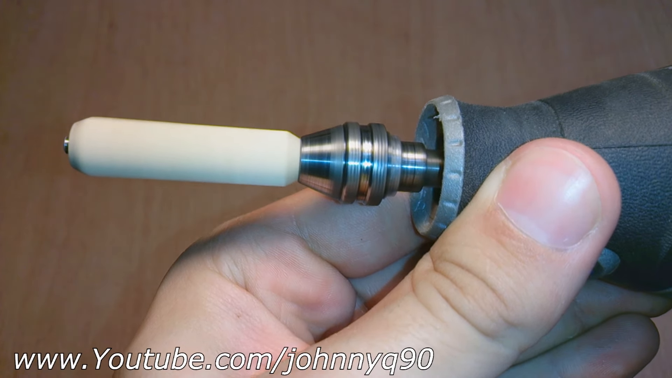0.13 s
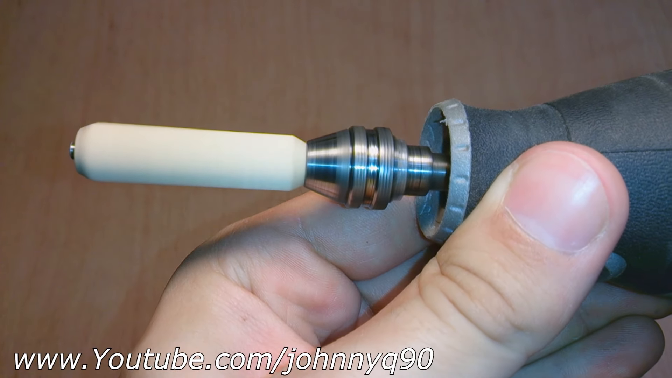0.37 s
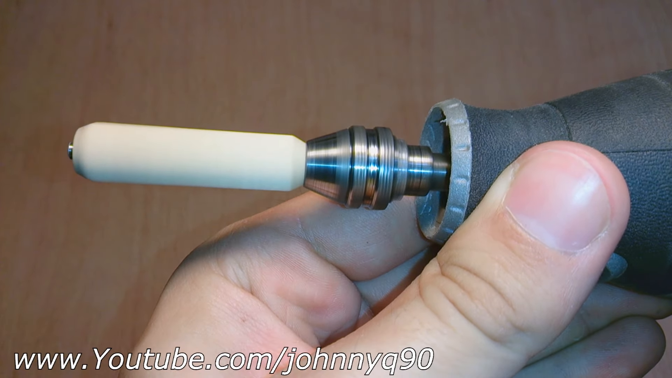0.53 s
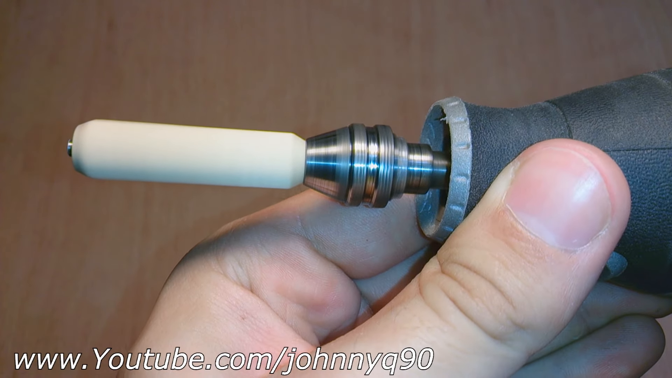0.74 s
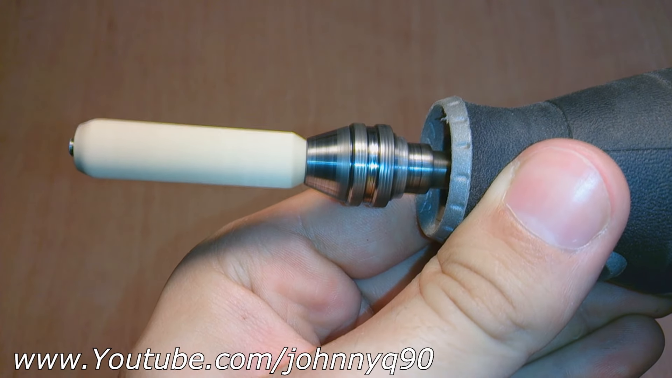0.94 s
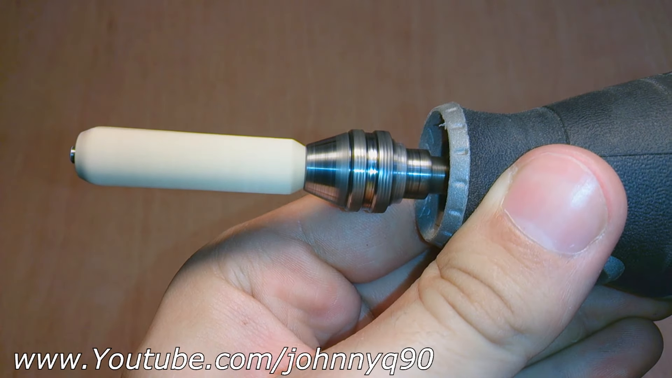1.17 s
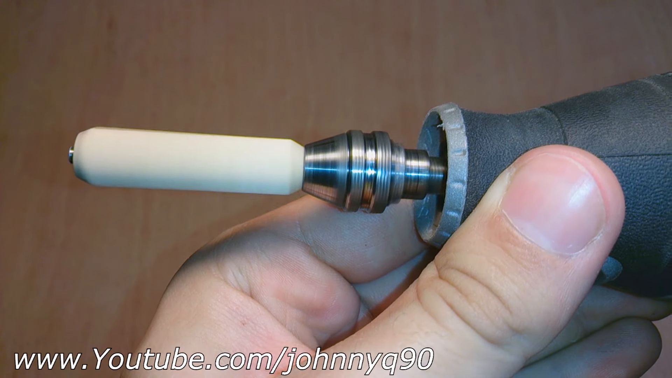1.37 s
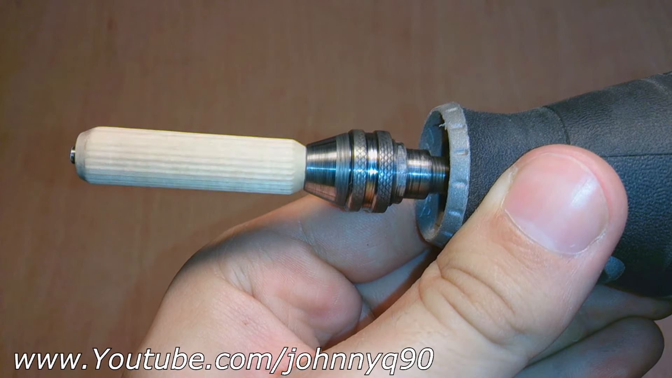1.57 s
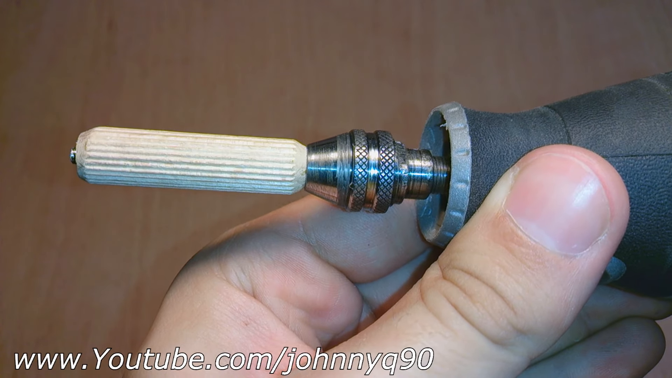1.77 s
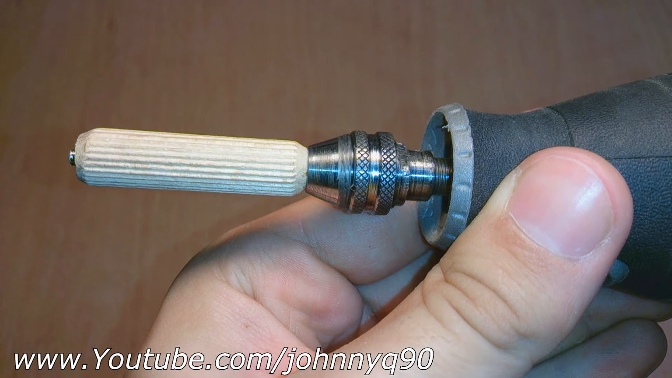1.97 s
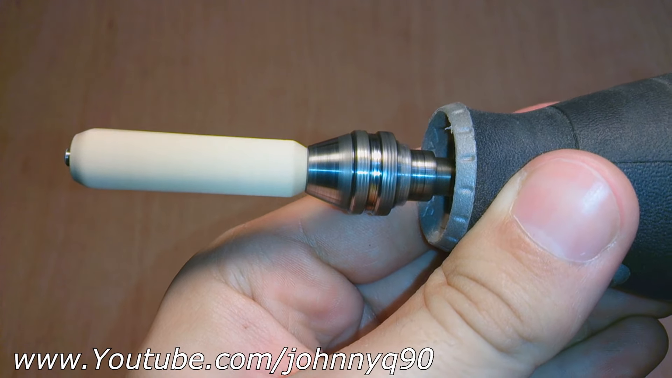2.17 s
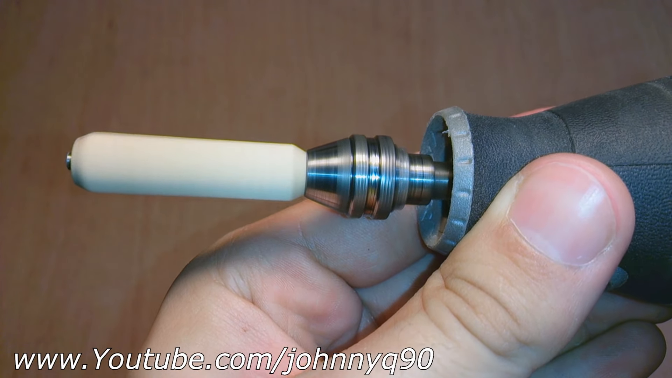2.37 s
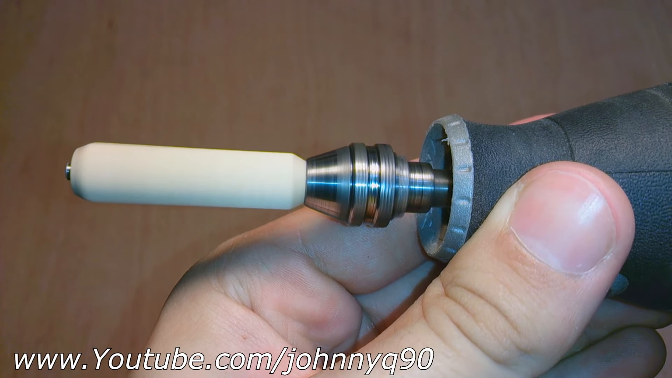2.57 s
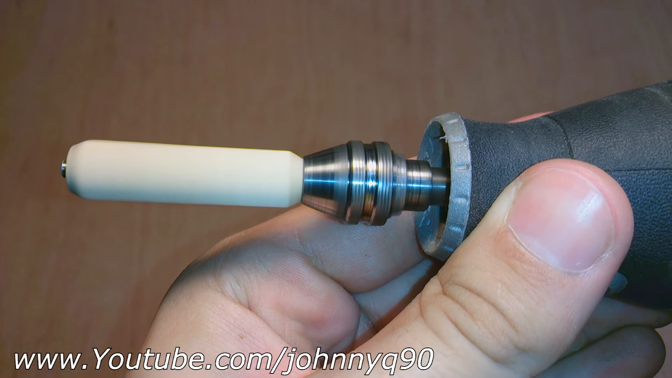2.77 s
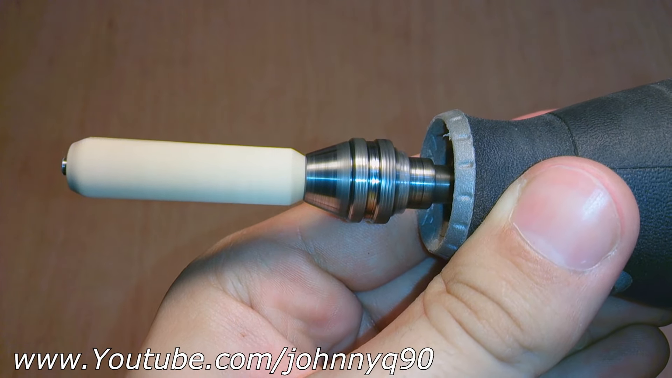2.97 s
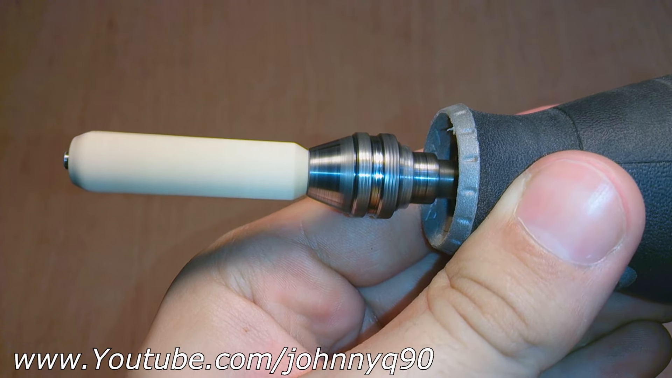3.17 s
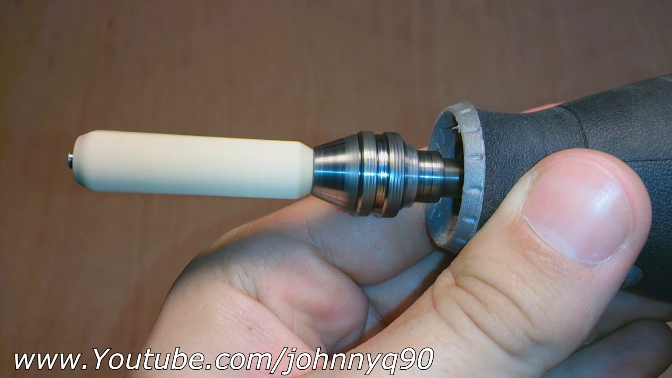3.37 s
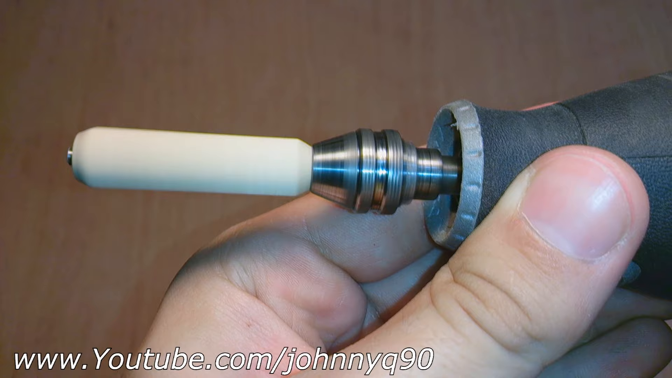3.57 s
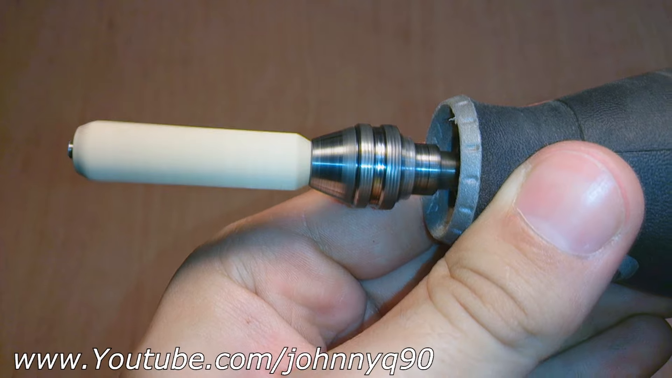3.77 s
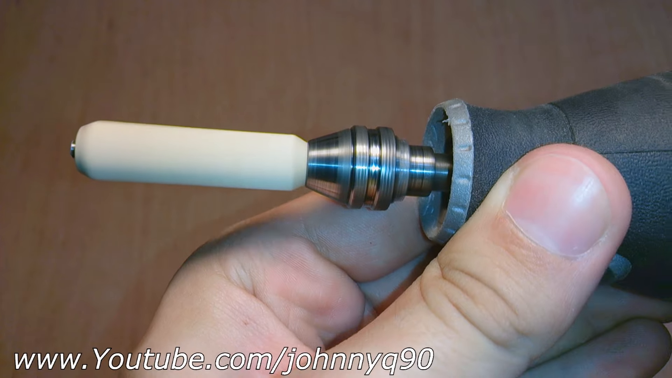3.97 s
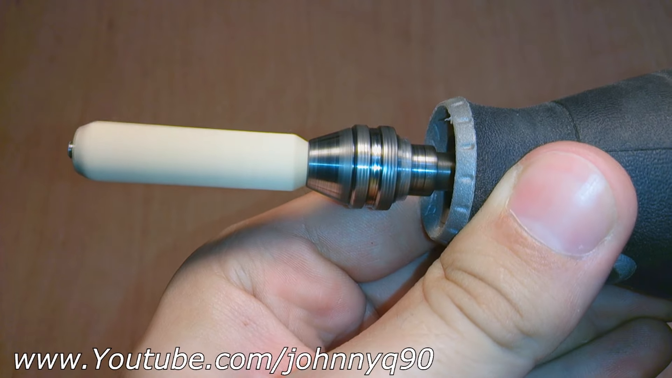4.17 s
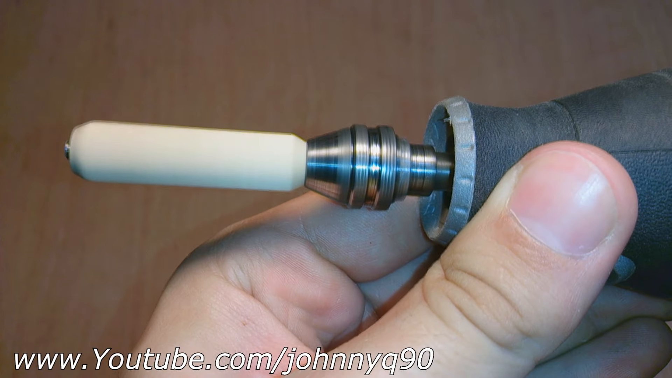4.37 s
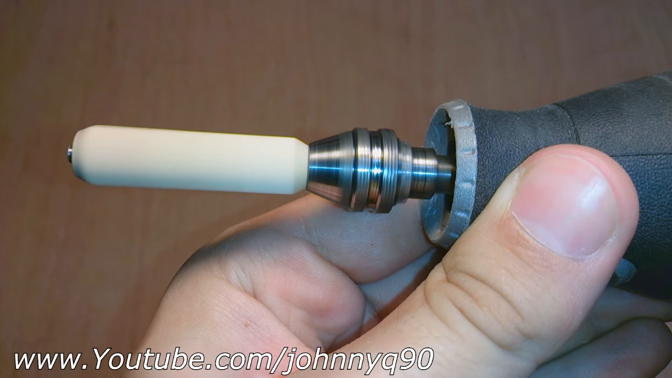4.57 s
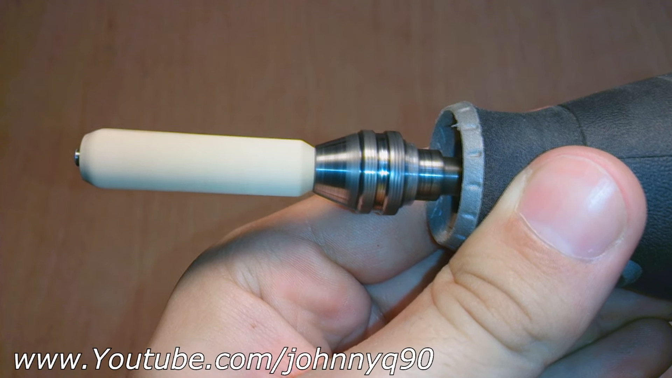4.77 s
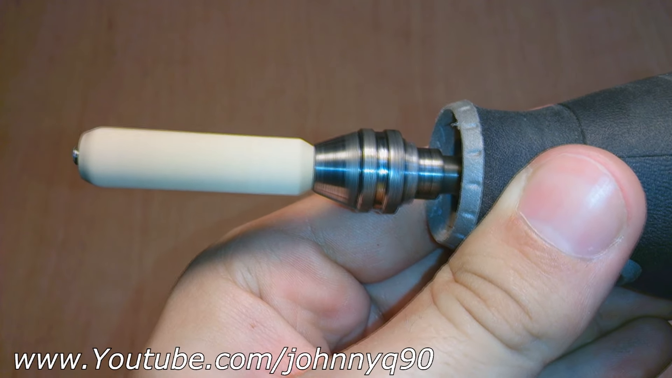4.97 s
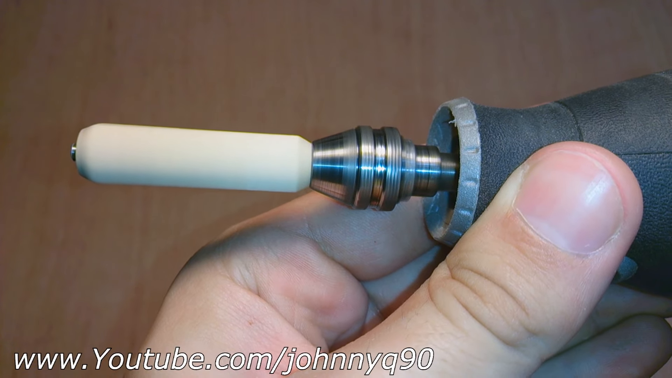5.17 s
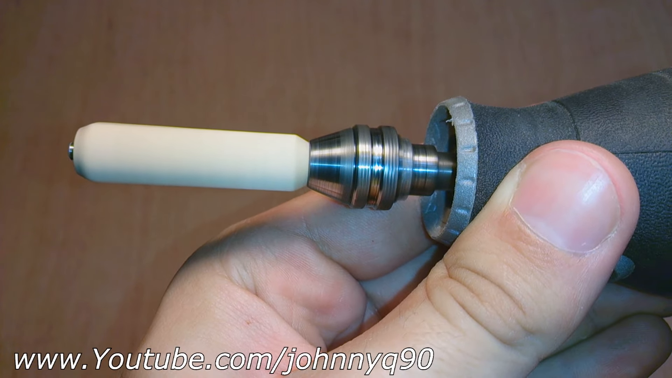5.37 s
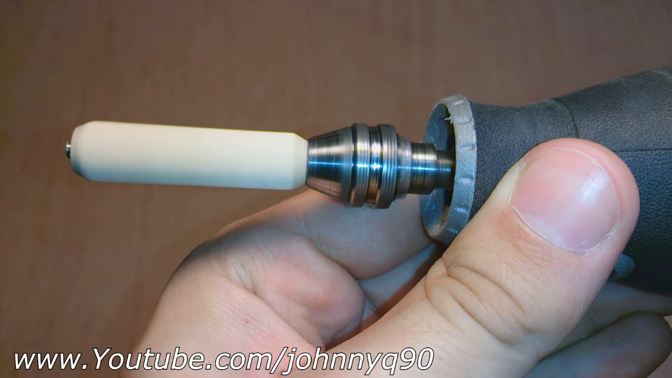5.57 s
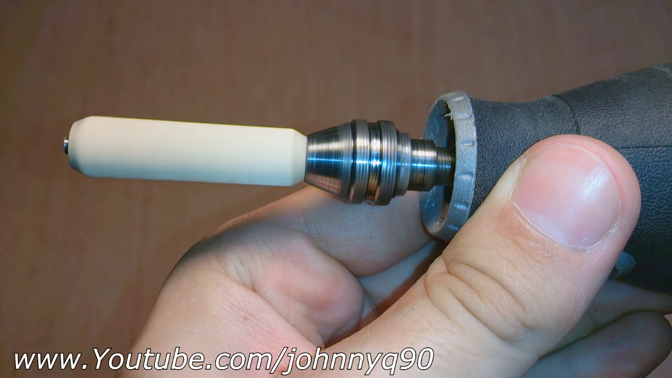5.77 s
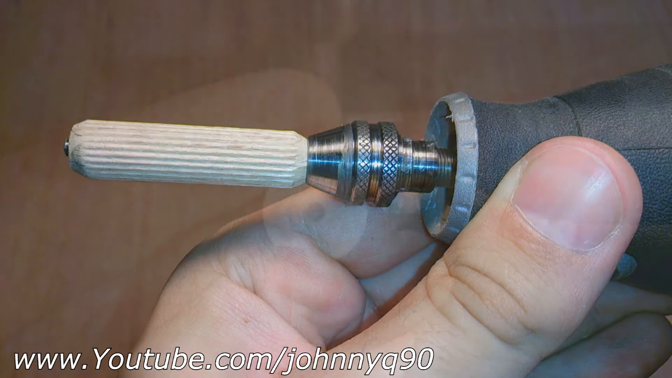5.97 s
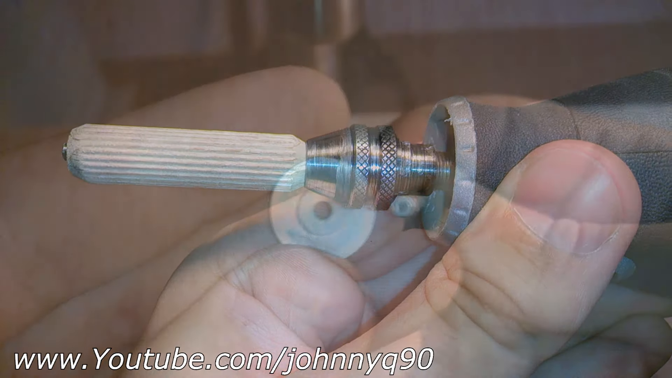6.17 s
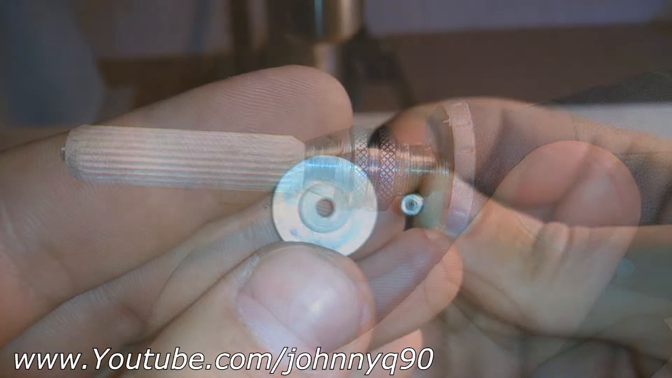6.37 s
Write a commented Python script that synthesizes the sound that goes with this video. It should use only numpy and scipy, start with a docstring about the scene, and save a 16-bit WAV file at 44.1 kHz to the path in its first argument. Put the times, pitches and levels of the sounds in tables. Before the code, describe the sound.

Close up, a handheld rotary tool spins down, revs up to a shrill whine with fluttering air, and coasts to a ticking stop.

```python
"""A handheld rotary tool spins a small wooden dowel close to the microphone. First it coasts to rest under
friction and fan drag, its carbon brushes slowing to single snaps. At 2.2 s the switch knocks, the brushes
fizz and the shaft climbs to full speed: the fan whines, the brushes hiss, ball bearings sing, the housing
rattles and cooling air buffets the microphone. At 4.1 s the power is cut with a squeak; the shaft coasts
to rest by 6.1 s, and light knocks follow. The right channel holds only a faint, hollow trace throughout."""
import sys
import numpy as np
from scipy import signal
from scipy.fft import rfft, irfft, next_fast_len
from scipy.io import wavfile
from scipy.ndimage import uniform_filter1d, map_coordinates

SR = 44100
rng = np.random.default_rng(int(sys.argv[2]) if len(sys.argv) > 2 else 0)


def dump_mix(stems):
    """Bounce the given channels to the path in sys.argv[1] as a 16-bit WAV at rate SR."""
    frames = np.atleast_2d(stems).T  # one column per channel
    limited = np.clip(frames, -1, 1)  # hard clip at full scale
    pcm = np.round(limited * 32767).astype(np.int16)
    wavfile.write(sys.argv[1], SR, pcm)


N = 282681
T = np.arange(N) / SR
SWITCH_ON_S, SWITCH_OFF_S = 2.233, 4.061
TOP_SPEED = 470.8   # all shaft speeds are in turns per second

# housing resonances: centre_hz, width_hz, gain_db
HOUSING_MODES = [(1170, 330, -17.5), (1900, 400, -8), (3384, 280, -3), (4388, 200, 6.5), (7330, 620, -8)]
# spectrum of sliding carbon: frequency_hz, level_db
BRUSH_SPECTRUM = [(3000, -33.5), (6000, -17), (7100, -11.5), (8300, -5.5), (9100, -6), (9750, -0.5),
                  (10600, -1), (11400, -5), (12100, -14), (12900, -7), (14000, -16.5), (15700, -17.5)]
# spectrum of the background hiss: frequency_hz, level_db
HISS_SPECTRUM = [(20, -2.5), (70, -13.5), (120, -17), (200, -25), (500, -31.5), (2000, -40.5), (8500, -41),
                 (10500, -29.5), (11250, -27), (12000, -30.5), (14000, -37), (15000, -28), (15800, -41.5)]
# the two coast-downs: standstill_s, drag_turns_per_s (where fan drag equals dry friction),
# miss_turns_per_s (below which the air misses the microphone)
COAST_DOWNS = [(1.7645, 513.2, 62), (6.057, 549, 112)]


def from_db(db):
    """Amplitude ratio of a level in decibels."""
    return 10 ** (np.asarray(db) / 20)


def rms_one(x):
    """Normalisation to an rms of 1."""
    return x / np.sqrt(np.mean(x ** 2) + 1e-20)


def even(x):
    """Division by the running 50 ms rms holds the level steady."""
    return x / np.sqrt(np.abs(uniform_filter1d(x * x, size=2205)) + 1e-9)


def ramp(start_s, length_s):
    """Linear rise from 0 to 1."""
    return np.clip((T - start_s) / length_s, 0, 1)


def noise():
    """Gaussian white noise of rms 1."""
    return rng.standard_normal(N)


def drift(rate_hz):
    """Low-passed noise: a random fluctuation of rms 1."""
    pole = np.exp(-20 * np.pi * rate_hz / SR)
    slow = signal.lfilter([1], [1, -2 * pole, pole * pole], rng.standard_normal(N // 10 + 4002))[4000:]
    return np.interp(np.arange(N) / 10, np.arange(len(slow)), rms_one(slow))


def colour(x, spectrum):
    """Zero-phase filtering by a curve of decibels over log frequency."""
    size = next_fast_len(N + 4096)
    hz = np.fft.rfftfreq(size, 1 / SR)
    corners_hz, db = np.transpose(spectrum)
    gain = from_db(np.interp(np.log(hz + 1e-9), np.log(corners_hz), db))
    return irfft(rfft(x, size) * gain, size)[:N]


def resonate(x, modes):
    """Modal superposition: damped resonators in parallel, with alternating signs."""
    out = 0
    for k, (hz, width_hz, db) in enumerate(modes):
        r = np.exp(-np.pi * width_hz / SR)
        ring = signal.lfilter([1, 0, -1], [1, -2 * r * np.cos(2 * np.pi * hz / SR), r * r], x + 1e-18)
        out = out + (-1) ** k * from_db(db) * (1 - r * r) / 2 * ring
    return out


def reflections(x, t60_s, gap_s):
    """Diffuse reverberation: convolution with a decaying noise tail of unit energy."""
    age = np.arange(SR // 2) / SR
    tail = rng.standard_normal(len(age)) * from_db(-60 * age / t60_s) * (age > gap_s)
    return signal.fftconvolve(x, tail / np.linalg.norm(tail))[:N]


def strikes(events, modes, scuff_s):
    """Impact excitation: each contact is a brief scuff that rings the modes."""
    out, age = np.zeros(N), np.arange(2048) / SR
    for (start_s, db), grit in zip(events, rng.standard_normal((len(events), len(age)))):
        hit = resonate(grit * np.exp(-age / scuff_s), modes)
        start = round(start_s * SR)
        out[start:start + len(age)] += (from_db(db) * hit / np.abs(hit).max())[:N - start]
    return out


def shaft_speed(start_s=2.2747, quick_share=.4873, quick_s=.0898, slow_s=.3889):
    """Torque balance: the motor pulls toward top speed; unpowered, dry friction and fan drag brake it."""
    friction = 194.3   # turns per second lost each second
    first_coast, second_coast = [drag * np.tan(np.clip(friction / drag * (stop_s - T), 0, 1))
                                 for stop_s, drag, _ in COAST_DOWNS]
    age = np.maximum(T - start_s, 0)
    shortfall = quick_share * np.exp(-age / quick_s) + (1 - quick_share) * np.exp(-age / slow_s)
    return first_coast + np.minimum(TOP_SPEED * (1 - shortfall), second_coast)


def shaft_tones(turns, orders, waver_db, slip_rad):
    """Rotational orders: wavering tones at multiples of the shaft's speed."""
    tones = 0
    for multiple, db in orders:
        amplitude = from_db(db + waver_db * drift(30))
        tones = tones + amplitude * np.sin(2 * np.pi * multiple * turns + slip_rad * drift(15))
    return tones


def decades(speed, reference):
    """Logarithmic speed: tenfold steps above a reference."""
    return np.log10(speed / reference + 1e-6)


def fade_below(speed, limit):
    """Third-order roll-off below a limiting speed, in dB."""
    return -10 * np.log10(1 + (limit / (speed + 1e-3)) ** 6)


def noise_db(law, speed, load, crawl_speed=7.7, knee_speed=290, dip_speed=343):
    """Power law: running noise grows with speed up to a knee, then dips near top speed."""
    knee_db, db_per_decade, load_db, top_speed_dip_db = law
    dip = np.clip((speed - dip_speed) / (TOP_SPEED - dip_speed), 0, 1) ** 2
    growth_db = db_per_decade * np.minimum(decades(speed, knee_speed), 0)
    return knee_db + growth_db + load_db * load - top_speed_dip_db * dip + fade_below(speed, crawl_speed)


def hiss():
    """The noise floor: steady coloured noise."""
    return rms_one(colour(noise(), HISS_SPECTRUM))


def hum(pitch_hz):
    """A low tone wavers by random amplitude and phase modulation."""
    return from_db(2.5 * drift(8)) * np.sin(2 * np.pi * pitch_hz * T + .6 * drift(8))


def draught(speed, load, arrives_s=2.408):
    """Strength of the cooling air at the microphone: a power law of speed, gentler under drive."""
    # air on the microphone: knee_db, growth_db_per_decade, load_gain_db, top_speed_dip_db
    draught_law = (-31.5, 51, -6.5, 6)
    before_on = T < SWITCH_ON_S
    miss_speed = np.where(before_on, COAST_DOWNS[0][2], COAST_DOWNS[1][2])
    powered = ~before_on * (1 - ramp(SWITCH_OFF_S, 0.047))
    db = noise_db(draught_law, speed, load) + fade_below(speed, miss_speed) - 3.5 * powered
    return (before_on + ramp(arrives_s, 0.01)) * from_db(db)


def buffeting(speed, lump_db=3.5, full_speed=380, crisp_db=-14.5):
    """Turbulence hits the microphone in lumps, the hardest crisp; slower air makes longer, deeper puffs."""
    # eddy pressure at full_speed: frequency_hz, level_db
    eddy_spectrum = [(12, -34.5), (20, -5.5), (53, 5), (204, 0.5), (393, -5.5), (573, -14), (1000, -37),
                     (1300, -62), (2200, -120)]
    lumps = from_db(lump_db * drift(94))
    crisp = rms_one(resonate(noise() * lumps ** 2, [(550, 550, 0)]))
    eddies = rms_one(colour(noise() * lumps, eddy_spectrum))
    eddies += from_db(crisp_db) * colour(crisp, [(900, -2), (2500, -31.5)])
    pace = np.clip(speed / full_speed, .15, 1.2) ** 0.65
    puffs = from_db(7 * np.clip(.85 - pace, 0, .5) * (drift(25) - .5))
    stretched = map_coordinates(eddies, [np.cumsum(pace)], order=3, mode="mirror")
    return puffs * rms_one(stretched)


def gusts():
    """Pressure pulses of single hard eddies thump the microphone."""
    # eddies: start_s, level_db
    eddies = [(4.079, -30), (4.379, -24.5)]
    # bands of one thump: centre_hz, width_hz, gain_db
    thump_bands = [(330, 220, -1), (750, 300, -1)]
    return colour(strikes(eddies, thump_bands, scuff_s=.003), [(900, 0), (2500, -28)])


def snaps_and_knocks():
    """Impacts ring the modes of the brush holders and the casing, with a short echo."""
    # brushes snapping over single segment edges at a crawl, and one sharp click of the brushes as the power
    # arrives: start_s, level_db
    snaps = [(1.6521, -48), (1.7025, -45.5), (1.7474, -43), (1.7814, -45), (2.2543, -26), (5.9673, -44),
             (5.9754, -46), (6.0112, -41), (6.0204, -48), (6.0294, -45.5), (6.0621, -51.5)]
    # brush holder resonances: centre_hz, width_hz, gain_db
    holder_modes = [(9460, 430, -7), (10370, 870, 5), (11650, 450, 3), (12300, 1300, -6)]
    # light knocks of the switch and the casing: start_s, level_db
    knocks = [(2.125, -63), (2.2354, -58), (2.2413, -43.5), (2.2474, -55), (2.2543, -36.5), (2.2727, -40),
              (6.1474, -59), (6.3729, -52), (6.3795, -55)]
    # casing resonances: centre_hz, width_hz, gain_db
    casing_modes = [(1150, 640, -2), (1840, 360, 2), (3280, 980, 7.5), (4470, 520, 11), (5600, 320, 6.5)]
    contacts = strikes(snaps, holder_modes, scuff_s=0.0019) + strikes(knocks, casing_modes, scuff_s=0.0021)
    return from_db(-1.5) * contacts + from_db(-7) * reflections(contacts, t60_s=0.096, gap_s=.003)


def unbalance(turns, speed):
    """Rotating unbalance shakes the tool once per turn."""
    return speed / 400 * np.sin(2 * np.pi * turns)


def inrush(decay_s):
    """The brushes fizz as the power arrives, with exponential decay."""
    envelope = ramp(SWITCH_ON_S, 0.011) * np.exp(-np.maximum(T - SWITCH_ON_S, 0) / decay_s)
    return envelope * rms_one(colour(noise(), BRUSH_SPECTRUM))


def squeak(pitch_hz, width_hz, length_s):
    """A burst of narrow-band noise makes a rough squeak as the power is cut."""
    envelope = np.exp(-((T - SWITCH_OFF_S) / length_s) ** 2)
    return envelope * rms_one(resonate(noise(), [(pitch_hz, width_hz, 0)]))


def commutator(turns):
    """Forced vibration: the brush arms radiate tones at high multiples of the shaft's speed."""
    # tones: shaft_multiple, level_db
    orders = [(24, 0), (28, -6)]
    # radiation of the brush arms: frequency_hz, gain_db
    arm_response = [(1000, -20), (1900, -7), (2600, -10), (3700, 4), (4200, -12)]
    return colour(shaft_tones(turns, orders, waver_db=3, slip_rad=.2), arm_response)


def armature(turns):
    """The armature's periodic magnetic pull forces the motor can to vibrate."""
    # magnetic tones: shaft_multiple, level_db
    orders = [(8, 9), (15.6, -2.5), (16, 3.5), (16.3, -3.5)]
    # radiation of the motor can: frequency_hz, gain_db
    can_response = [(300, -34), (1200, -12), (1700, -10), (2400, -5), (2900, -8), (3400, 3), (3850, 1),
                    (4400, -1), (5000, 9), (5600, -8), (7000, -8), (13000, -6)]
    return colour(shaft_tones(turns, orders, waver_db=1.5, slip_rad=.3), can_response)


def bearings(turns, direct_db, ring_db):
    """Balls roll and slip on their races; each tone swells by resonance as it crosses a housing mode."""
    # rolling tones: shaft_multiple, level_db
    orders = [(2.55, -3), (7.66, -0.5), (9.85, -13), (10.2, -8), (11.21, -8), (12.72, 0), (23, -2)]
    tones = shaft_tones(turns, orders, waver_db=2.5, slip_rad=.4)
    return from_db(direct_db) * tones + from_db(ring_db) * resonate(tones, HOUSING_MODES)


def rattle(grain_db):
    """Random excitation: dense small impacts keep the housing's modes ringing."""
    return rms_one(resonate(noise() * from_db(grain_db * drift(250)), HOUSING_MODES))


def vent_air():
    """Turbulent flow through the vents makes a broadband rush."""
    # rushing air: frequency_hz, level_db
    air_spectrum = [(300, -13.5), (750, -7), (1200, 3), (1650, -3), (2400, -0.5), (3300, 4), (3900, -1),
                    (5000, 1.5), (5900, 4), (7500, 1.5), (12000, -4.5)]
    return rms_one(colour(noise(), air_spectrum))


def segment_clicks(turns, segments=8, wear_spread_db=3.5):
    """An impulse train: one click at each edge of the commutator's unequal segments."""
    edges = np.arange(1, int(turns[-1] * segments))
    edge_samples = np.interp(edges, turns * segments, np.arange(N))
    wear = rng.standard_normal(segments)
    wear_db = wear_spread_db * rms_one(wear - wear.mean())
    sizes = from_db(wear_db[edges % segments] + noise()[edges])
    clicks = np.zeros(N)
    for tap in np.arange(-6, 8):   # sinc pulses place the clicks between samples
        index = np.clip(edge_samples.astype(int) + tap, 0, N - 1)
        np.add.at(clicks, index, sizes * np.sinc(index - edge_samples))
    return clicks


def brushes(turns, speed, load, grain_db=-0.5):
    """Sliding friction of carbon makes a grainy hiss; impacts at the segment edges add a whirr."""
    # ring of a segment edge: frequency_hz, level_db
    edge_spectrum = [(3000, -28), (5800, -19), (6900, -3), (8100, -3), (8900, -9), (9700, 0), (10600, 0),
                     (11400, -8), (12400, -5), (13200, -12), (15700, -21)]
    # loudness of the brushes: speed_turns_per_s, level_db
    level_curve = [(0, -100), (2, -74), (24, -62), (45, -54.5), (95, -45), (145, -41.5), (215, -33.5),
                   (295, -27), (425, -27), (470, -31.5)]
    clicks = segment_clicks(turns)
    # echoes inside the motor smear the clicks, so their overtones swell and fade as they glide
    whirr = even(colour(clicks + reflections(clicks, t60_s=.012, gap_s=.0003), edge_spectrum))
    sliding = rms_one(colour(noise() * from_db(grain_db * drift(400)), BRUSH_SPECTRUM))
    # at high speed the whirr fades and only hiss remains
    edge_db = np.interp(speed, [40, 110, 180, 280, 400, 450], [-9, -4.5, -2, -6.5, -13, -24])
    level_db = np.interp(speed, *np.transpose(level_curve)) + load   # full load adds 1 dB
    return from_db(level_db) * even(sliding + from_db(edge_db) * whirr)


def fan(turns, speed, load, blades=18, top_db=-26, db_per_decade=64, load_db=2):
    """A whine at the blade-passing frequency grows as a steep power of speed."""
    # vent peaks and dips that the whine sweeps through: centre_hz, width_hz, gain_db
    vent_bands = [(1100, 500, 10), (2870, 200, 3), (3330, 160, 6), (3690, 110, -4), (4210, 80, -6),
                  (4550, 300, 3), (5830, 120, -12), (6310, 130, -11), (7230, 170, -10)]
    vents_db = sum(db * np.exp(-((blades * speed - hz) / width) ** 2) for hz, width, db in vent_bands)
    whine_db = top_db + db_per_decade * decades(speed, TOP_SPEED) + vents_db + load_db * np.sqrt(load)
    coasting = (T < SWITCH_ON_S) + ramp(SWITCH_OFF_S, 0.54)
    waver_db = .4 + 1.4 * coasting   # the whine flutters more as it glides down
    phase = 2 * np.pi * blades * turns + .06 * drift(90)
    return np.sqrt(2) * from_db(whine_db + waver_db * drift(30)) * np.sin(phase)


def scene():
    """Superposition: the shaft's rotation drives the running sounds, over a faint background."""
    # background swelling toward the end: time_s, gain_db
    ambience_curve = [(0, -2.5), (2.2, 3), (6.0, 7), (6.41, 10.5)]
    # housing rattle: knee_db, growth_db_per_decade, load_gain_db, top_speed_dip_db
    rattle_law = (-45, 20.5, 8, 7.5)
    # air through the vents: same columns
    air_law = (-47.5, 36.5, -4, 4.5)
    speed = shaft_speed()
    turns = np.cumsum(np.maximum(speed, 1)) / SR
    # the torque of spinning up loads the bearings and armature; its pulsing makes their tones rasp
    acceleration = uniform_filter1d(np.gradient(speed) * SR, size=4410)
    load = np.clip(acceleration / 600, 0, 1)
    rasp = 1 + .7 * load * np.sin(2 * np.pi * 100 * T)
    rattle_db = noise_db(rattle_law, speed, load)
    air_db = noise_db(air_law, speed, load)
    bearing_db = air_db + 9 * load + fade_below(speed, 140)   # slow bearings roll quietly

    tool = fan(turns, speed, load)
    tool += from_db(-28) * squeak(pitch_hz=8750, width_hz=300, length_s=.016)
    tool += brushes(turns, speed, load)
    tool += from_db(-43) * inrush(decay_s=0.025)
    tool += from_db(bearing_db) * rasp * bearings(turns, direct_db=-14, ring_db=3)
    tool += from_db(air_db - 14.5 + 19.4 * load) * rasp * armature(turns)
    tool += from_db(rattle_db - 6) * commutator(turns)
    tool += from_db(rattle_db) * rattle(grain_db=2.5)
    tool += from_db(air_db + 9) * vent_air()
    tool += snaps_and_knocks()
    wind = draught(speed, load) * buffeting(speed) + gusts()
    ambience = from_db(np.interp(T, *np.transpose(ambience_curve)))
    left = tool + wind + ambience * (from_db(-81) * hum(pitch_hz=122) + from_db(-76) * hiss())

    # response of the right channel, which hears mostly the room: frequency_hz, gain_db
    right_response = [(60, -55.5), (200, -53), (400, -32), (700, -19.5), (1250, -12), (2400, -21.5),
                      (4400, -29.5), (8100, -36), (10500, -45), (15000, -27)]
    room = reflections(tool + wind, t60_s=0.11, gap_s=0.0043)
    right = colour(0.45 * tool + 0.74 * room, right_response)
    right += from_db(-78.5) * unbalance(turns, speed) + ambience * from_db(-86) * hiss()
    return from_db(7) * np.array([left, right])


def record(dry):
    """Soft saturation rounds the loudest peaks; a steep low-pass cuts the top at 15.8 kHz."""
    rounded = .55 * np.tanh(dry / .55)
    return signal.sosfilt(signal.ellip(12, .1, 80, 15800, fs=SR, output="sos"), rounded)


dry = scene()
out = record(dry)
dump_mix(out)
```